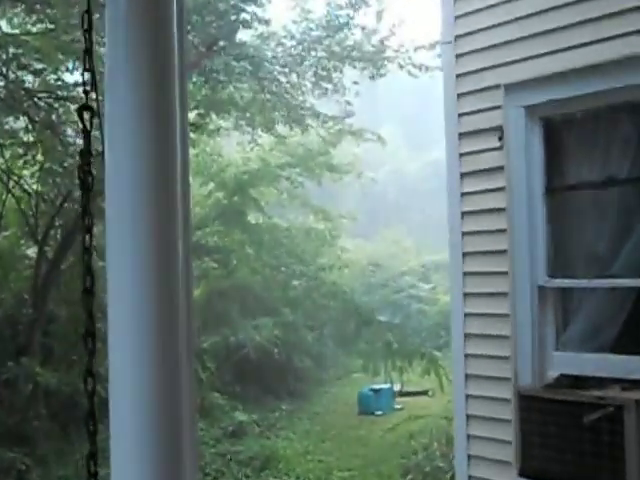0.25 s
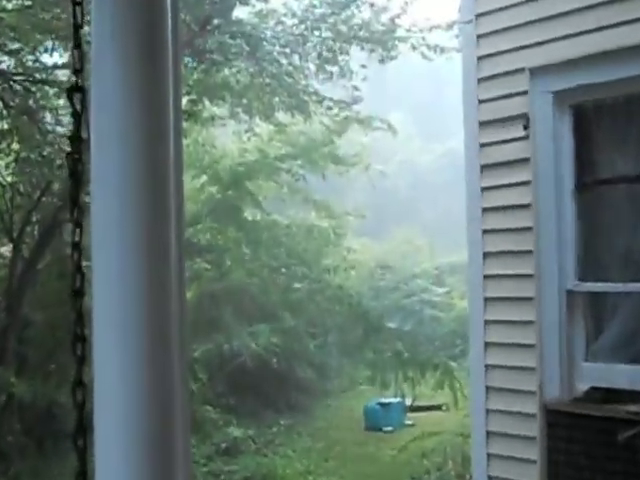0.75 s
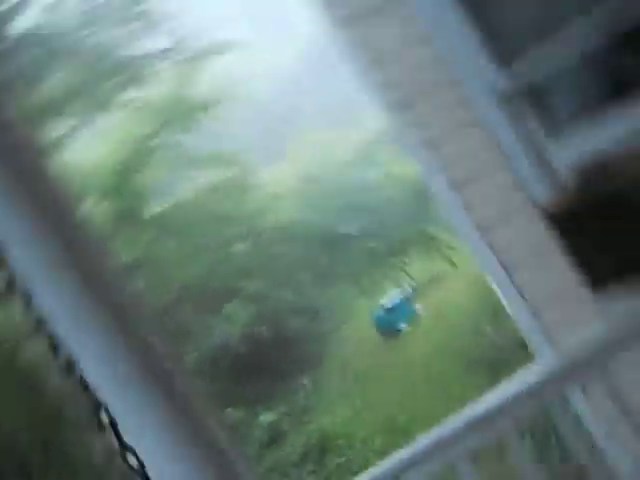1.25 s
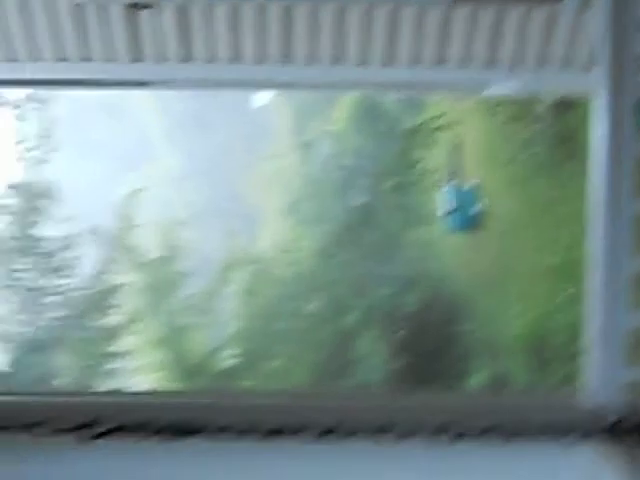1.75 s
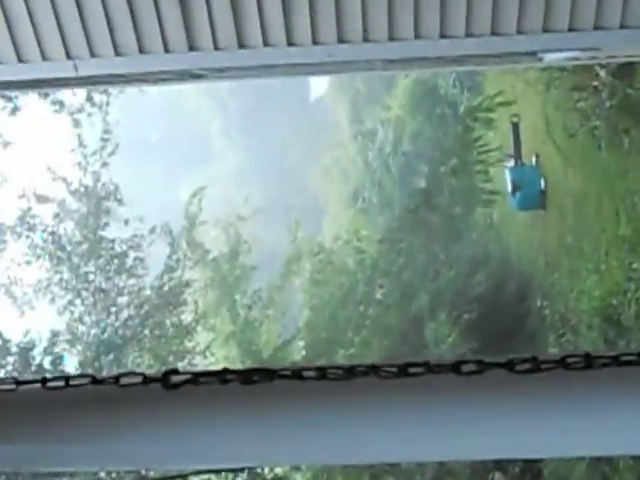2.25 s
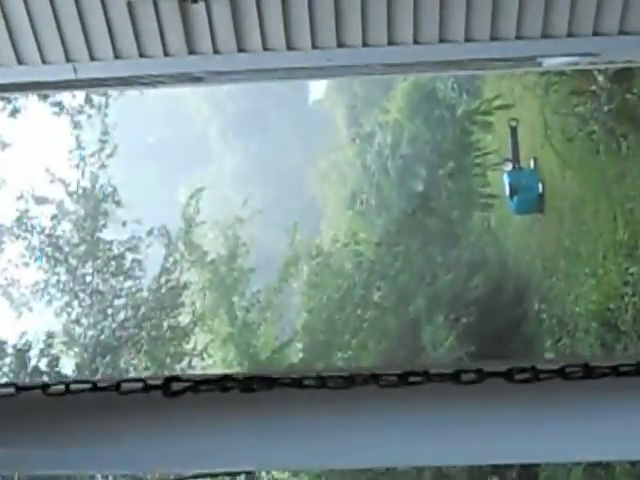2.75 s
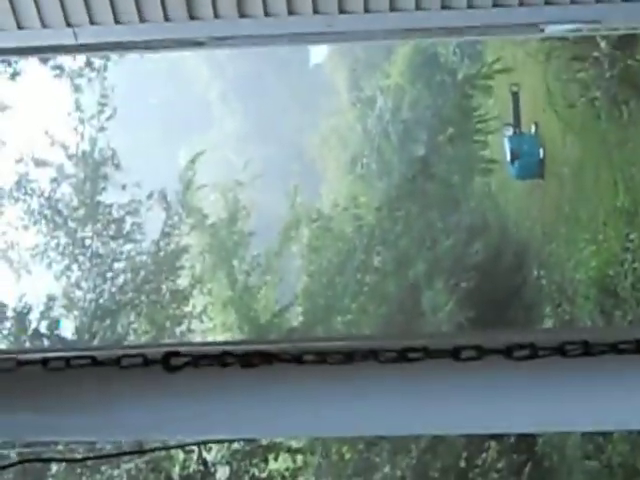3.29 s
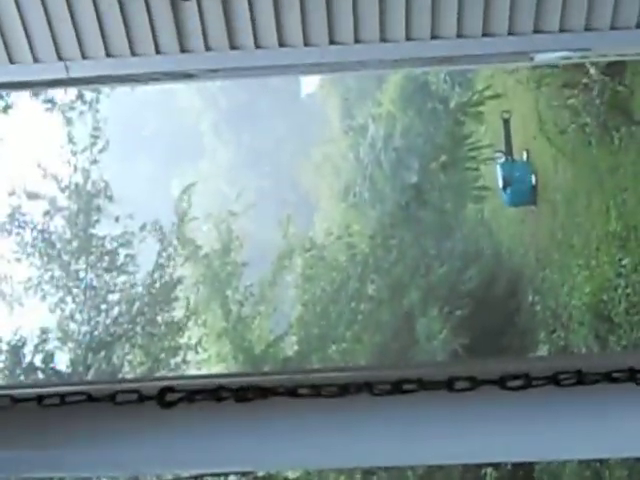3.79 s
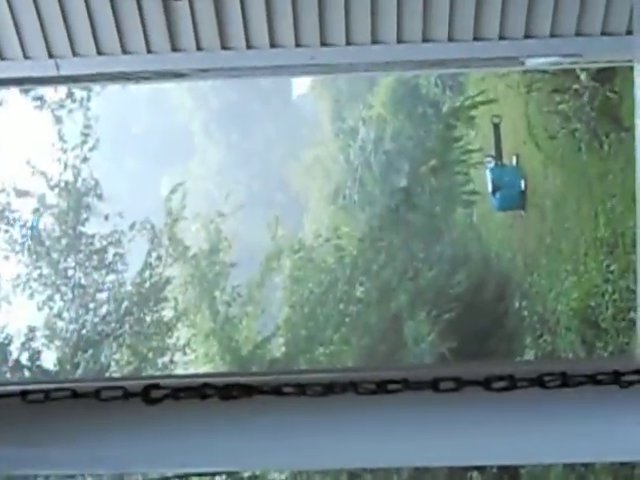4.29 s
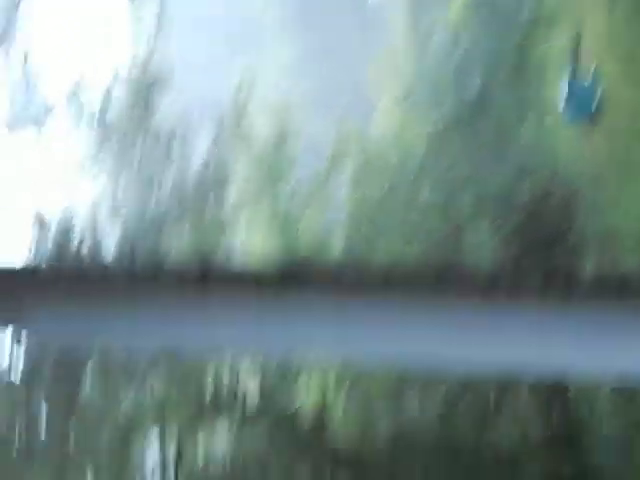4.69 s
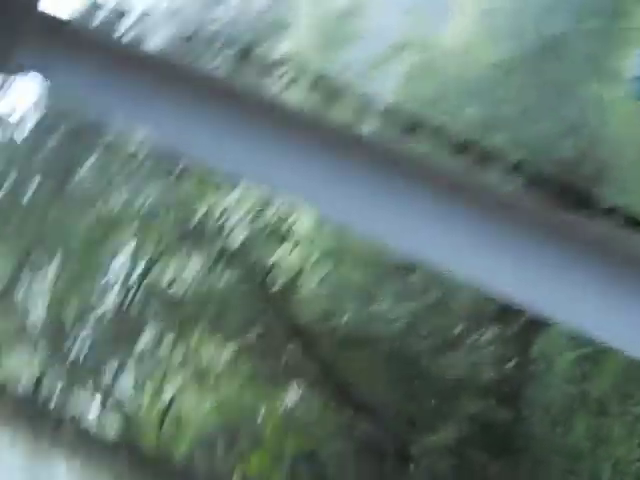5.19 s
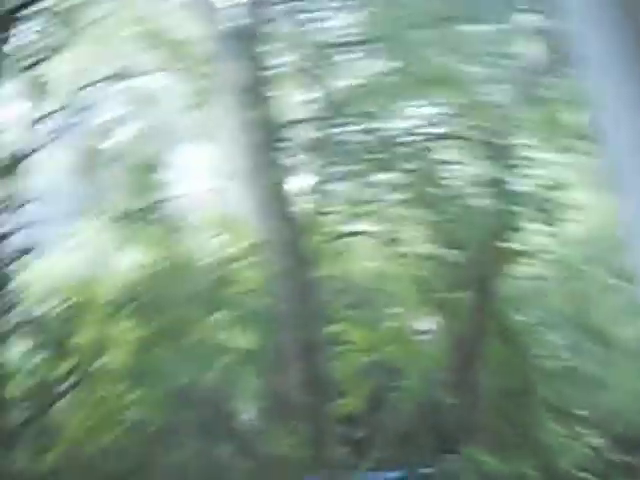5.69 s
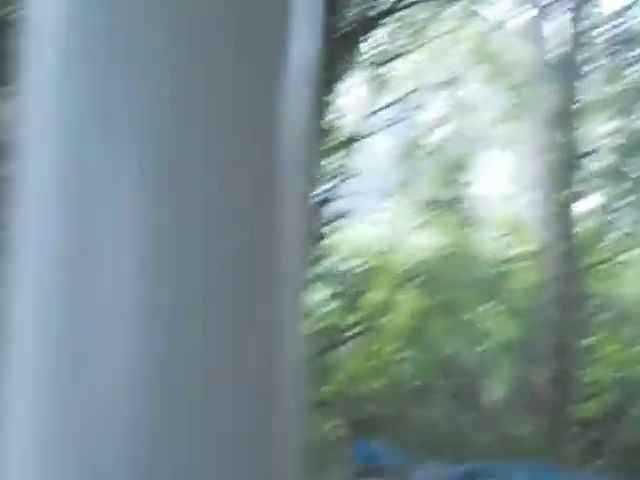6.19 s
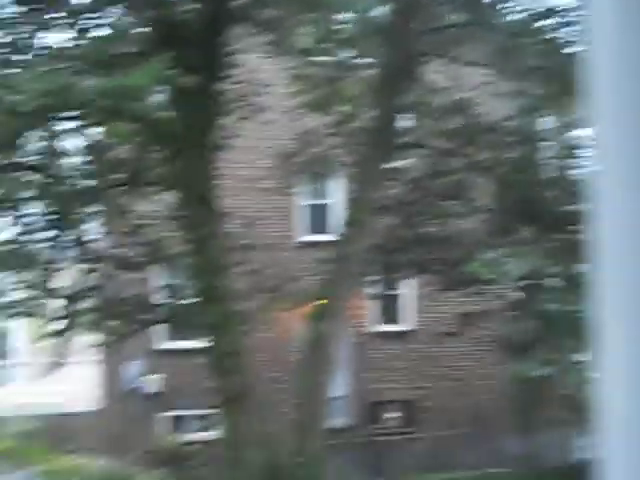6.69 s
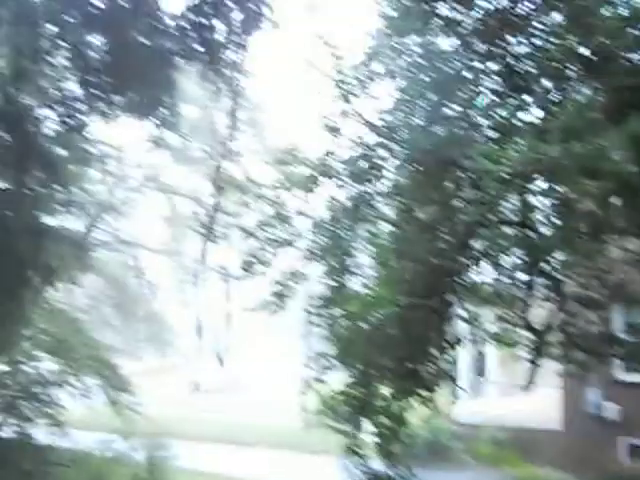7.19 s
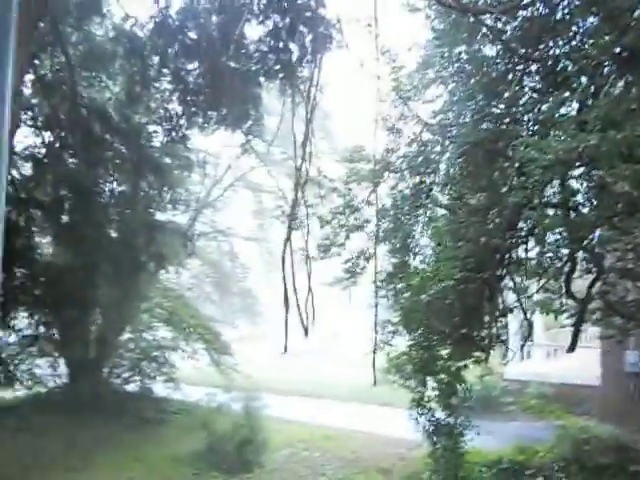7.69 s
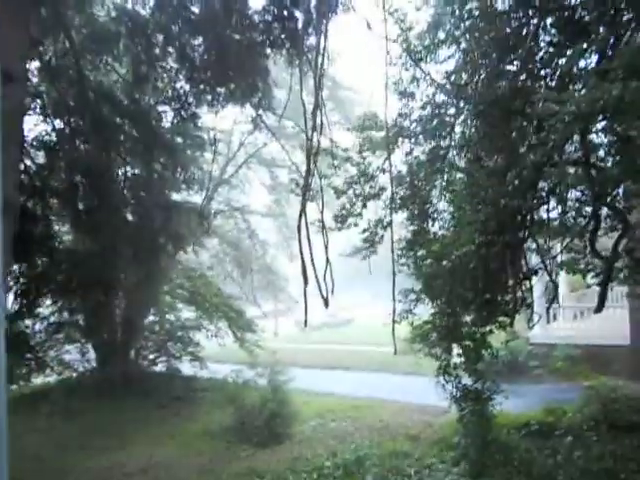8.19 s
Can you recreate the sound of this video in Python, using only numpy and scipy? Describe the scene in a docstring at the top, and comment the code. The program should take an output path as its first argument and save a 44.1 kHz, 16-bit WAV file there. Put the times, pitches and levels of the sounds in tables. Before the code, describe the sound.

Dense downpour on yard and leaves with nearby drips and ticks; one hard knock briefly ducks the rain, then low thunder rumbles far off.

```python
"""Heavy, even rain heard from a porch: noise wash plus ticking drops; an air conditioner hums in sine tones.
Early on the rain sounds duller for a moment as the camera rolls (a swell of broad mid-range noise).
Drips splash close by (noise bursts); sharp ticks (clicks) make the camera's gain control dip.
Then a drop hits the camera (decaying tones), overloads it and ducks the rain.
Last, the camera turns to the duller street side, where far thunder rumbles twice (low noise swells)."""
import sys
import numpy as np
from scipy import signal
from scipy.fft import rfft, irfft, next_fast_len
from scipy.io import wavfile
from scipy.ndimage import uniform_filter1d, minimum_filter1d

SR = 44100
rng = np.random.default_rng(int(sys.argv[2]) if len(sys.argv) > 2 else 0)


def generate_wav(sig):
    """Save sig (samples, or channels by samples) to the path in sys.argv[1] as 16-bit PCM at SR."""
    pcm = np.round(np.clip(np.atleast_2d(sig).T, -1, 1) * 32767).astype(np.int16)
    wavfile.write(sys.argv[1], SR, pcm)


N = 372644
TIME = np.arange(N) / SR


def amp(db):
    """Decibels to gain."""
    return 10 ** (np.asarray(db) / 20)


def unit(x):
    """Scales to rms 1."""
    return x / np.sqrt(np.mean(x ** 2) + 1e-20)


def swells(rows):
    """Gain over time: a Gaussian bell for each (time [s], level [dB], sigma [s])."""
    return sum(amp(db) * np.exp(-.5 * ((TIME - s) / sigma_s) ** 2) for s, db, sigma_s in rows)


def read(points, hz):
    """Interpolates a dB curve on a log-frequency axis."""
    f, db = np.transpose(points)
    return np.interp(np.log(hz + 1), np.log(f + 1), db)


def colour(x, points):
    """Filters by a dB curve, zero phase."""
    n = next_fast_len(N)
    gain = amp(read(points, np.fft.rfftfreq(n, 1 / SR)))
    return irfft(rfft(x, n) * gain, n)[:N]


def resonance(x, hz, width_hz):
    """Passes x through one spectral peak, half amplitude at hz +- width_hz."""
    f = np.fft.rfftfreq(len(x), 1 / SR)
    return irfft(rfft(x) / (1 + ((f - hz) / width_hz) ** 2), len(x))


def band_noise(hz, width_hz):
    """Steady noise in one resonance, rms 1."""
    noise = rng.standard_normal(next_fast_len(N))
    return unit(resonance(noise, hz, width_hz)[:N])


def add(mix, s, sound):
    """Mixes a sound in at time s."""
    part = mix[round(s * SR):][:len(sound)]
    part += sound[:len(part)]


def lag(x, seconds):
    """One-pole smoothing with a time constant."""
    r = np.exp(-1 / (seconds * SR))
    return signal.lfilter([1 - r], [1, -r], x)


def wash(patchy_db=0.48, flicker_db=0.43):
    """Countless far drops merge to noise, its level varying in brief time-frequency patches."""
    z = signal.stft(rng.standard_normal(N), nperseg=512, noverlap=384)[2].T
    patches = uniform_filter1d(rng.standard_normal(z.shape), size=16, axis=0)
    patches = unit(uniform_filter1d(patches, size=18, axis=1))
    flicker = unit(uniform_filter1d(rng.standard_normal(len(z)), size=14))[:, None]
    z = z * amp(patchy_db * patches + flicker_db * flicker)
    return unit(signal.istft(z.T, nperseg=512, noverlap=384)[1][:N])


def patter(drops_per_s=3200, spread_db=3.0, cycles=1.63, low_hz=2000, high_hz=10000, count=28):
    """Nearer drops on leaves and boards: short decaying ticks of many pitches and random sizes."""
    t, out = np.arange(512) / SR, np.zeros(N)
    for hz in np.linspace(low_hz, high_hz, count):
        size = amp(spread_db * np.minimum(rng.exponential(1, N), 4))
        falls = rng.random(N) < drops_per_s / count / SR
        sign = rng.choice([-1, 1], N)
        tick = np.exp(-t * hz / cycles) * np.cos(2 * np.pi * hz * t)
        out += signal.oaconvolve(size * falls * sign, unit(tick))[:N]
    return unit(out)


def rain(yard_drops_db=-10, street_drops_db=-9, yard_db=-18.5, street_db=-19.0, turn_s=6.66, turn_length_s=.9):
    """Wash plus patter; the bright yard crossfades to the duller street as the camera turns."""
    # rain spectrum on each side: (frequency [Hz], relative level [dB])
    yard_spectrum = [(15, -41), (25, -9.5), (59, -7.5), (86, -12.5), (153, -6.5), (207, -7.5), (295, -4),
                     (460, -5), (713, -1.4), (900, -1.5), (1170, .5), (1450, -1.85), (1900, -5),
                     (4600, -3.5), (6380, -3.5), (8010, -5), (10300, -10), (13400, -31), (22000, -120)]
    street_spectrum = [(15, -39), (25, -8), (70, -6.5), (97, -7.5), (183, -5), (453, -4), (613, -4),
                       (750, -2.5), (1090, -1), (1480, -3), (2000, -6.5), (2850, -5), (4490, -4.5),
                       (8210, -9), (10300, -13), (13400, -33), (22000, -120)]
    far, near = wash(), patter()
    yard = unit(colour(far + amp(yard_drops_db) * near, yard_spectrum))
    street = unit(colour(far + amp(street_drops_db) * near, street_spectrum))
    facing = np.clip(.5 + (TIME - turn_s) / turn_length_s, 0, 1)  # 0 yard, 1 street
    return (1 - facing) * amp(yard_db) * yard + facing * amp(street_db) * street


def camera_roll(mid_hz=1100, mid_width_hz=900):
    """The rain sounds duller for a moment as the camera rolls: a swell of broad mid-range noise."""
    # mid-range swell: (time of maximum [s], level [dB], sigma [s])
    dulling = [(1.35, -30, 0.39)]
    return swells(dulling) * band_noise(mid_hz, mid_width_hz)


def spray(hz, width_hz, t60_s):
    """Droplet burst: noise round one pitch swells quickly and dies away; peak smoothed rms 1."""
    t = np.arange(8192) / SR
    noise = resonance(rng.standard_normal(len(t)), hz, width_hz)
    age = t * np.log(1000) / t60_s
    burst = noise * np.sqrt(age) * np.exp(-age)
    return burst / np.sqrt(lag(burst ** 2, .006).max())


def splashes(relative_width=0.26):
    """Big drips from the eaves splat near the porch, each a spray of droplets."""
    # drips: (time [s], level [dB], pitch [Hz], decay t60 [s])
    drips = [(.635, -22, 3200, .05), (1.345, -24, 3000, 0.057), (1.798, -24, 3600, 0.029),
             (2.825, -27, 1000, .3), (2.918, -22, 1200, 0.02), (3.218, -21, 3700, 0.06),
             (4.103, -24, 3000, .11), (5.291, -21, 2900, 0.02), (5.535, -19, 9500, .012),
             (5.741, -17.5, 6500, .025), (6.48, -21, 3240, .025), (6.931, -23, 4800, .052),
             (6.961, -20.5, 4300, .041), (7.091, -22, 3650, .014), (7.756, -18.5, 3900, .04),
             (8.268, -19.5, 3400, .045)]
    out = np.zeros(N)
    for s, db, hz, t60_s in drips:
        add(out, s, amp(db) * spray(hz, relative_width * hz, t60_s))
    return out


def ticks(rise_s=0.00021, top_hz=18600, top_db=8.6):
    """Droplets by the microphone: clicks whose shrill top is barely heard but drives the gain control."""
    # droplets: (time [s], level without the top [dB], pitch [Hz])
    droplets = [(1.8, -10.5, 3600), (2.141, -8.5, 6030), (2.924, -8.5, 1910), (8.272, -9.5, 3400)]
    t, out = np.arange(512) / SR, np.zeros(N)
    shape = t / rise_s * np.exp(1 - t / rise_s)
    top = amp(top_db) * np.sin(2 * np.pi * top_hz * t)
    for s, db, hz in droplets:
        add(out, s, amp(db) * shape * (np.sin(2 * np.pi * hz * t) + top))
    return out


def case_hit(hit_s=5.2992, smack_db=10, start_hz=8200, end_hz=2200, fall_s=0.00151, smack_t60_s=0.011):
    """A drop smacks the camera with a fast-falling pitch and briefly rings the modes of its case."""
    # case modes: (frequency [Hz], level [dB], decay t60 [s])
    modes = [(1150, -12, .03), (3020, -2, 0.021), (3900, 4, 0.014), (4950, 3, 0.0098), (6200, 1, .006),
             (7660, 4.5, 0.0066), (8900, -2, 0.0082)]
    t, out = np.arange(4096) / SR, np.zeros(N)
    ring = sum(amp(db - 60 * t / t60_s) * np.sin(2 * np.pi * hz * t) for hz, db, t60_s in modes)
    pitch_hz = end_hz + (start_hz - end_hz) * np.exp(-t / fall_s)
    smack = amp(smack_db - 60 * t / smack_t60_s) * np.sin(2 * np.pi * np.cumsum(pitch_hz) / SR)
    add(out, hit_s, ring + smack)
    return out


def thunder(thud_hz=38, thud_width_hz=18):
    """Far thunder: a low resonant roll swells twice, with two deep thuds."""
    # rumbles and thuds: (time of maximum [s], level [dB], sigma [s])
    rumbles = [(6.85, -36, 1), (7.98, -39, 0.084)]
    thuds = [(6.77, -42, .05), (6.972, -35, .05)]
    # roll resonances: (frequency [Hz], half-width [Hz], relative level [dB])
    resonances = [(101.4, 13, -1), (144, 29, -7.5)]
    roll = unit(sum(amp(db) * band_noise(hz, width_hz) for hz, width_hz, db in resonances))
    return swells(rumbles) * roll + swells(thuds) * band_noise(thud_hz, thud_width_hz)


def air_conditioner(hum_hz=59.1, hum_db=-46, waver=.08, waver_hz=2.2, fourth_db=-8):
    """Window unit: the compressor's hum and its fourth harmonic, wavering slowly in level."""
    phase = 2 * np.pi * hum_hz * TIME
    tone = np.sqrt(2) * (np.sin(phase) + amp(fourth_db) * np.sin(4 * phase))
    return amp(hum_db) * tone * (1 + waver * band_noise(0, waver_hz))


def scene():
    """All sources at one microphone."""
    near = splashes() + ticks() + case_hit()
    return (rain() + camera_roll() + near + thunder() + air_conditioner())[None]


def gain_control(x, limit_db=-9.5, overreaction=1.55, deepest_db=-13.0, sense_s=.001, attack_s=.0016,
                 settle_s=0.014, settle_share=0.5, hold_s=0.51, recover_s=1.35, overshoot=0.28):
    """A peak cuts the gain by more than its excess; the cut is held, then released to full gain."""
    level = np.sqrt(lag(x ** 2, sense_s) + 1e-12)
    wanted = np.clip((amp(limit_db) / level) ** overreaction, amp(deepest_db), 1)
    half = int(hold_s * SR / 2)
    # window shifted into the past: hold
    cut = 1 - minimum_filter1d(wanted, 2 * half + 1, origin=half, mode="nearest")
    # exponential release aims past full gain but stops there
    release = np.exp(-TIME / recover_s)
    cut = np.maximum.accumulate((cut + overshoot) / release) * release - overshoot
    fast, slow = lag(cut, attack_s), lag(cut, settle_s)
    return x * (1 - (1 - settle_share) * fast - settle_share * slow)


def record(dry, clip_level=.67, edge_hz=16500):
    """Gain control, microphone colour, overload clipping, treble cut and band limit."""
    # microphone response: (frequency [Hz], gain [dB])
    response = [(20, -0.5), (1300, 0), (1620, 0.67), (2200, -0.6), (2950, 0.45), (3600, -0.9), (4800, 0.78),
                (7000, -0.5), (10300, 0.5), (10650, -5), (11000, -7.5), (11700, -0.5), (12350, -8),
                (12700, -60)]
    x = colour(gain_control(dry[0]), response)
    clipped = np.clip(x, -clip_level, clip_level)
    softened = colour(clipped, [(10500, 0), (14000, -13.5)])  # dulls the top of the overload
    lowpass = signal.firwin(127, edge_hz, window=("kaiser", 9), fs=SR)
    return signal.oaconvolve(softened, lowpass, "same")[None]


dry = scene()
out = record(dry)
generate_wav(out)
```